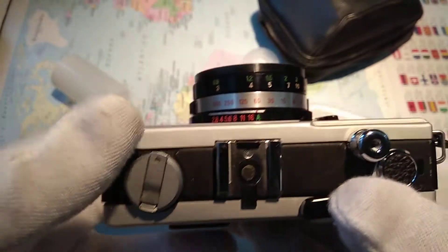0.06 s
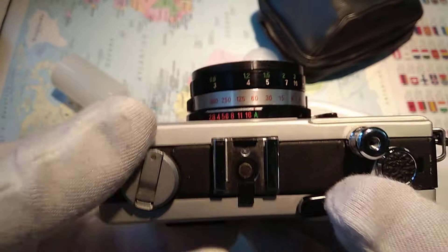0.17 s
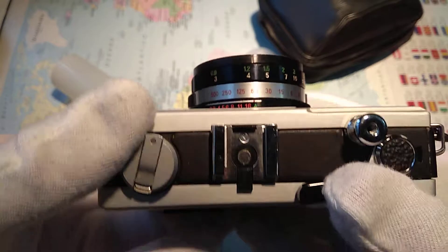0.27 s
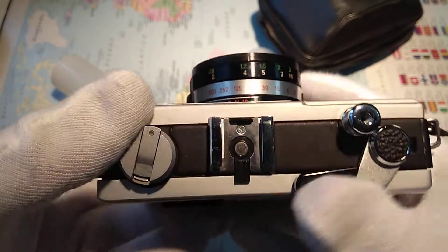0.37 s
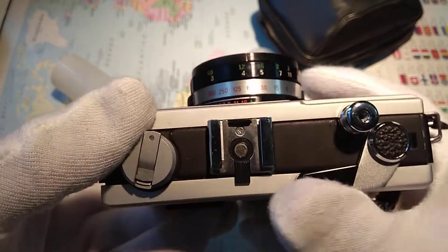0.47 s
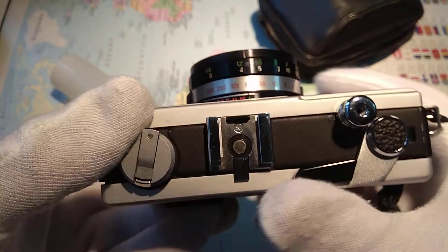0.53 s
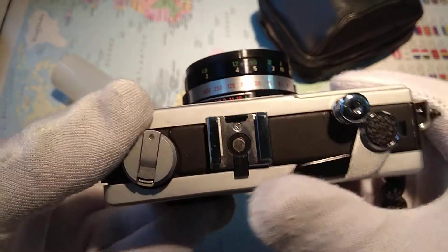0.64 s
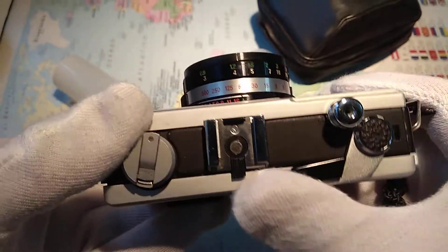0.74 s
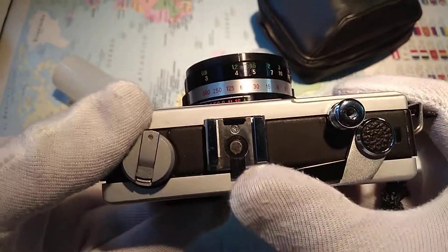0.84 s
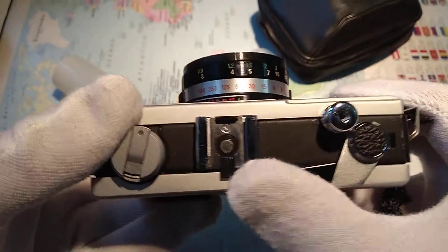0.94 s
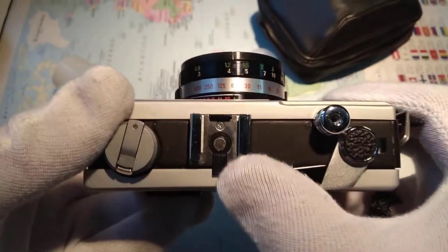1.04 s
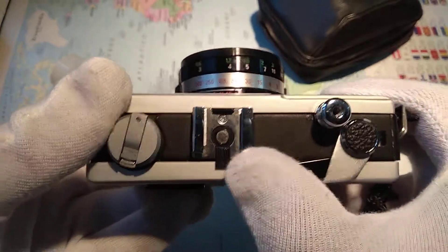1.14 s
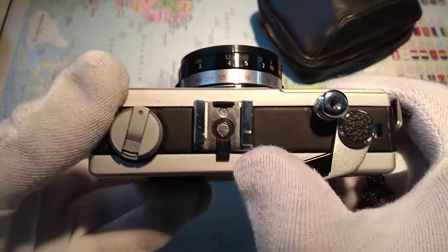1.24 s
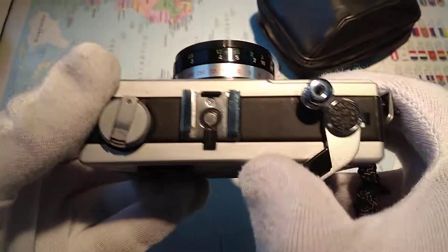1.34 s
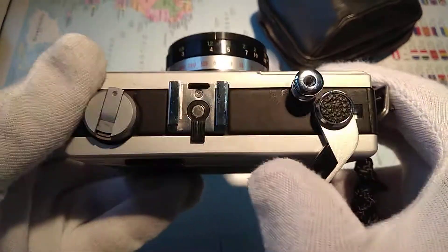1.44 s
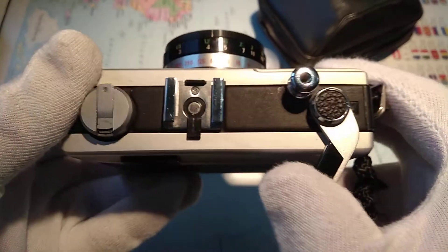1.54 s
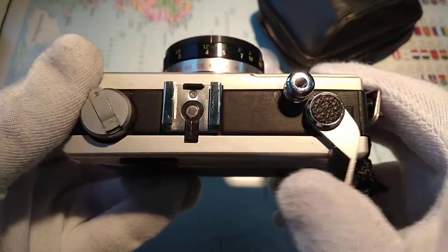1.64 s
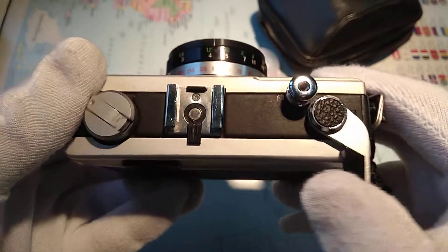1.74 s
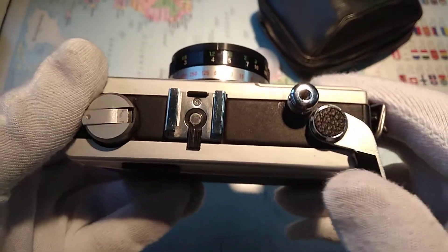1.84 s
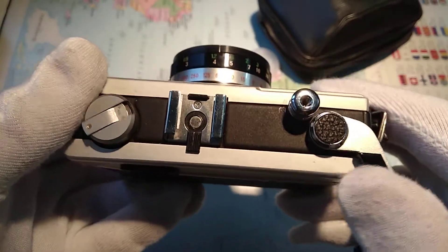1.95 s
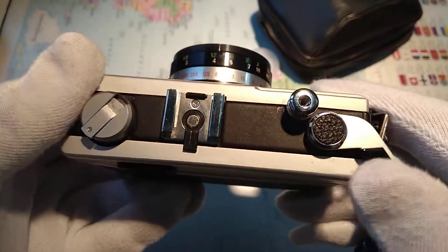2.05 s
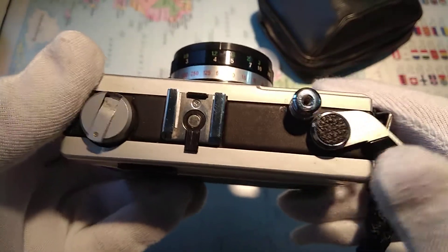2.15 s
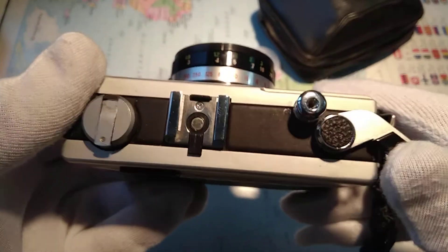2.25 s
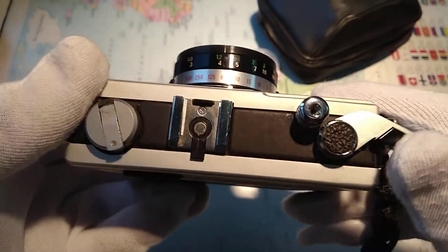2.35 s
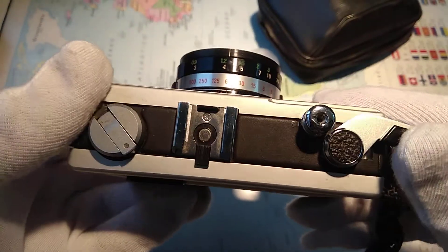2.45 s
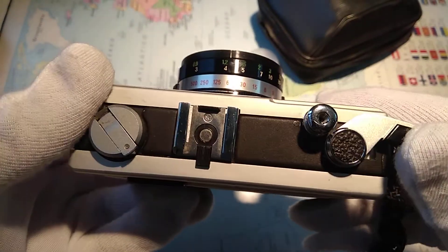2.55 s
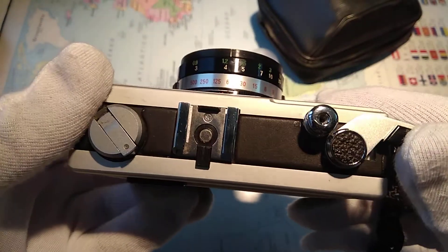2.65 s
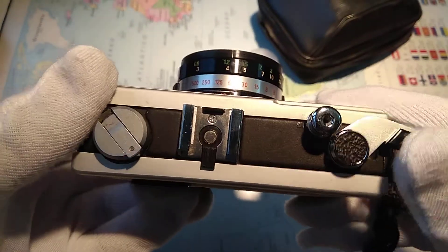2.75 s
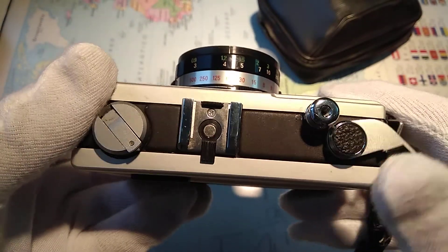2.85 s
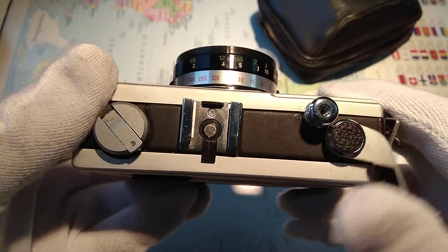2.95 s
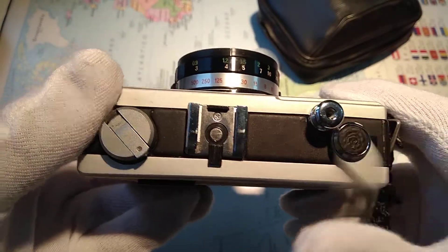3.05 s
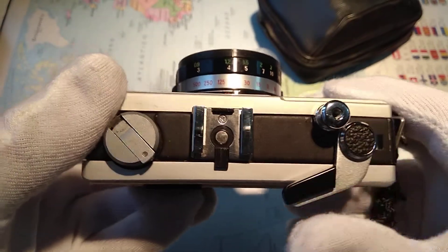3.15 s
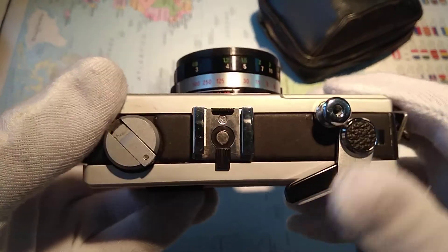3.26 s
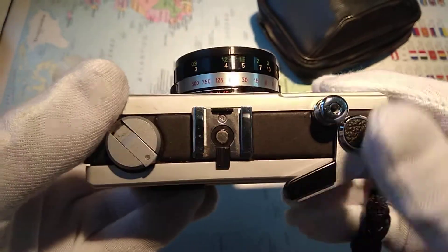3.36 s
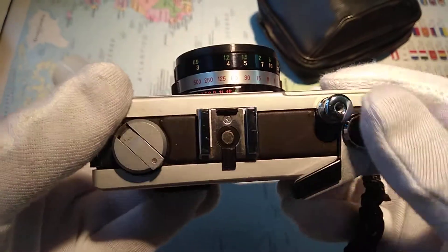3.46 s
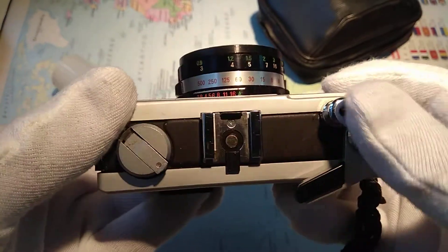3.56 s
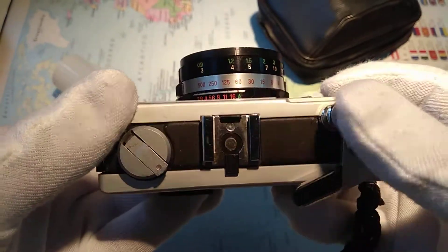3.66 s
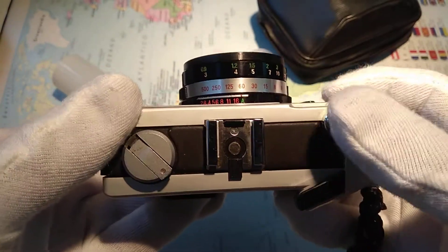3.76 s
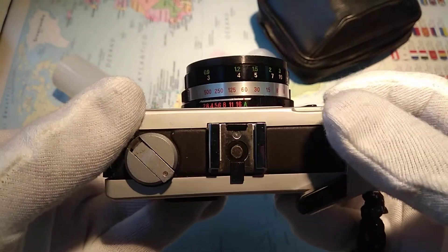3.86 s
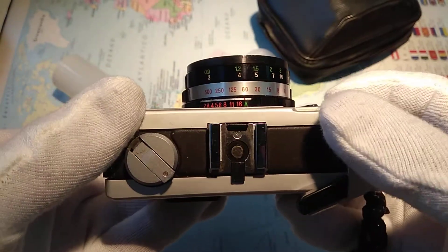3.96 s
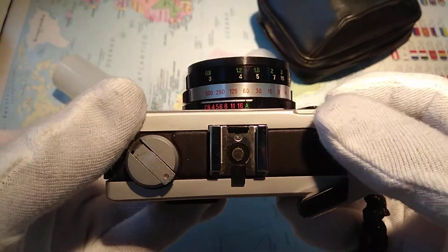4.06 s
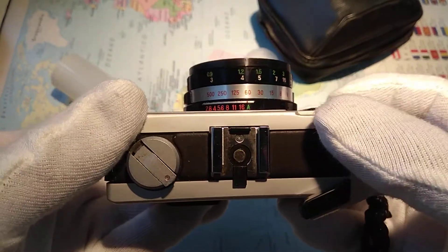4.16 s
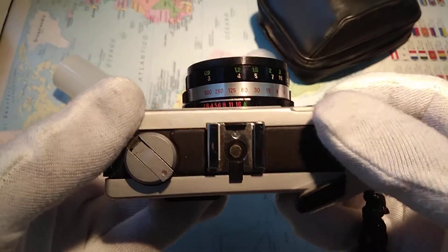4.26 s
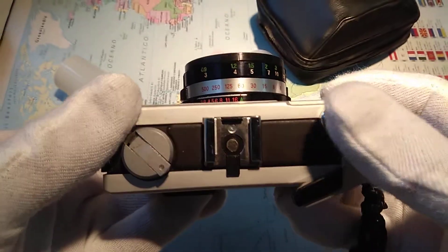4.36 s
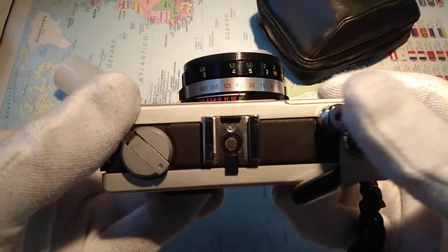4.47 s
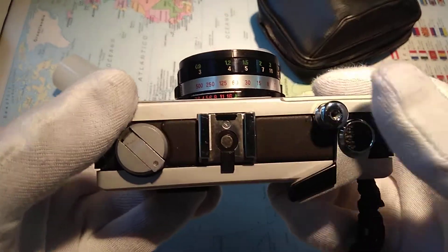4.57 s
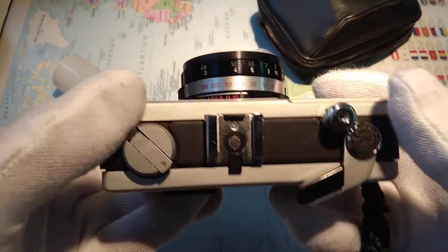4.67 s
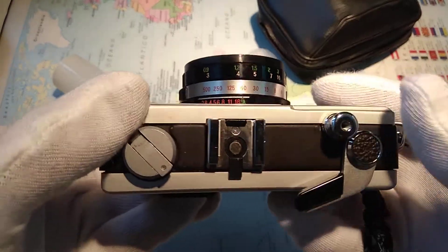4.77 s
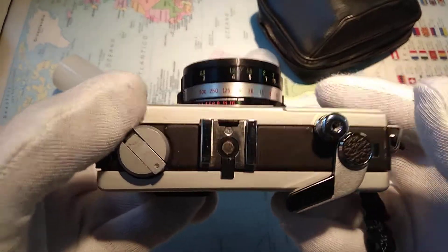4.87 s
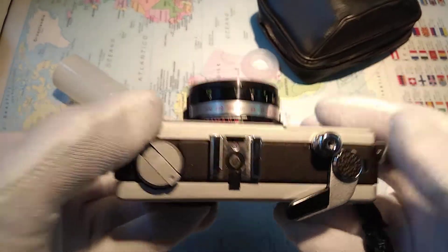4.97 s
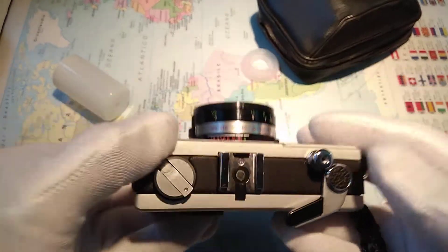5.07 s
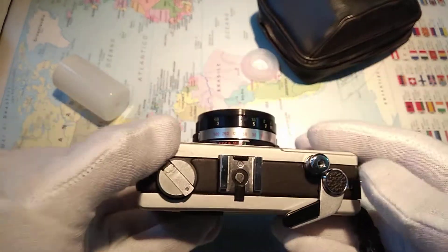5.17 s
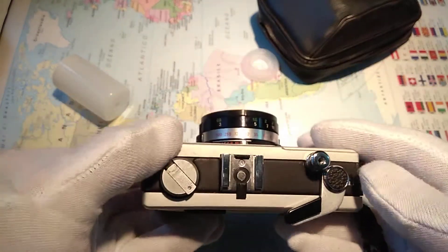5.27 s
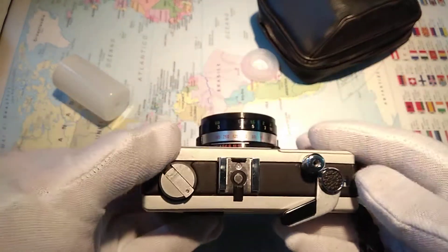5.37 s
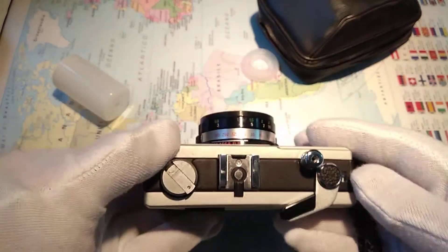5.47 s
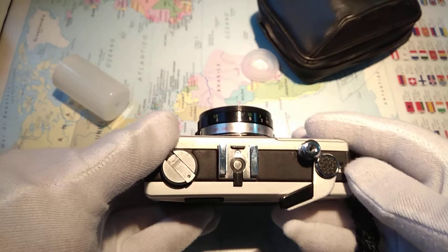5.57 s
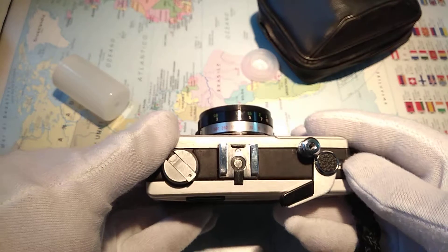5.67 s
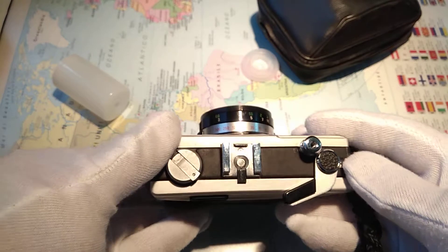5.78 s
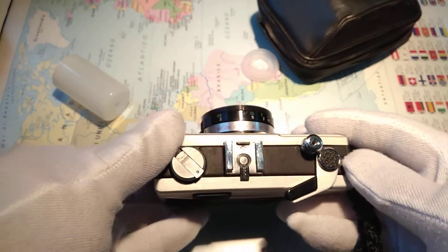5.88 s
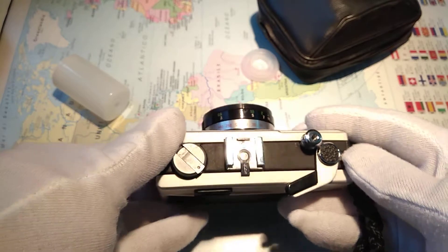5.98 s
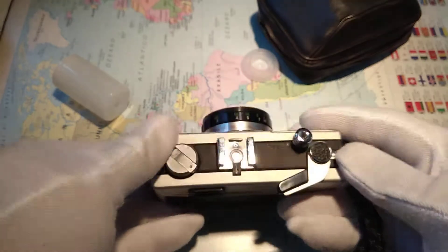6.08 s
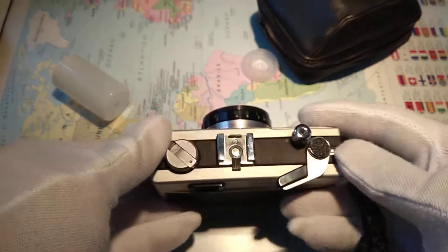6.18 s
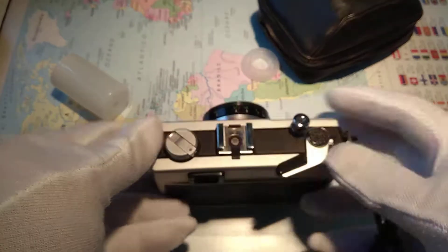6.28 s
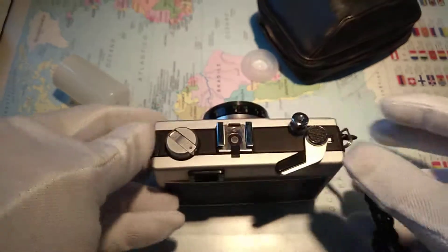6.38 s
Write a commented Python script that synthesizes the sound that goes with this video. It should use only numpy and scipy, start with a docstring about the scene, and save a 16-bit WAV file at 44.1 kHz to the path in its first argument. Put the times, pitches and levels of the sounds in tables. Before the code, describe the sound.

A close stereo phone-like pickup in a small room, with quiet low air murmur and soft cotton-glove hiss throughout. Light rubbing opens it; a clear small tick comes at 0.7 s, with fainter ones to 1.5 s. From 1.53 to 2.52 s the winding lever rasps: some forty dry, bright, uneven ratchet clicks, 20 to 30 milliseconds apart, with fine grit between. After a near-silent pause, faint clicks at 2.86 s lead into four or five strong return clicks from 3.01 s and a loud metallic clack at 3.14 s, ringing briefly. Small ticks follow at 3.6 s. The shutter fires at 4.13-4.16 s, a tight sharp double snap with a faint singing spring. Ticks at 4.39 and 4.5 s, then sparse rubbing, a brighter brush at 5.75 s. At 6.12 s the camera lands with a hard knock and short woody thump, then slight rustle as room air rises.

```python
"""A small metal film camera is wound by gloved hands: the pawl clicks over its ratchet, the lever springs back
to its stop, the shutter fires and the camera lands on a desk. Each blow is a short rattle of noise that rings
metal parts and a hollow shell; plates, spring and desk are fading sine tones. Cotton gloves hiss and room air
murmurs as shaped noise, and a small room answers the blows with fading noise."""
import sys
import numpy as np
from scipy import signal
from scipy.fft import rfft, irfft, next_fast_len
from scipy.io import wavfile
from scipy.ndimage import uniform_filter1d

SR = 44100
rng = np.random.default_rng(int(sys.argv[2]) if len(sys.argv) > 2 else 0)


def store_wav(level_fs):
    """Save 16-bit WAV to argv[1]."""
    pcm = np.round(np.clip(np.atleast_2d(level_fs), -1, 1) * 32767)
    wavfile.write(sys.argv[1], SR, pcm.T.astype(np.int16))


N = 282881  # length in samples

LEVER_HZ, LEVER_WIDTH_HZ = 9330, 330  # note of the winding lever
PAWL_PAN_DB = -1.5  # left minus right


def gain(db):
    """Turn decibels into a factor for the wave."""
    return 10 ** (np.asarray(db) / 20)


def frequencies(x):
    """Frequencies of the spectrum of x, nudged off zero so that logarithms work."""
    return np.arange(x.shape[-1] // 2 + 1) * SR / x.shape[-1] + 1e-3


def colour(x, points):
    """Filter by a curve through (Hz, dB) points, straight on a log-frequency axis."""
    hz, db = np.transpose(points)
    curve_db = np.interp(np.log(frequencies(x)), np.log(hz), db)
    return irfft(rfft(x) * gain(curve_db), x.shape[-1])


def band(x, hz, octaves):
    """Keep a bell-shaped band on a log-frequency axis."""
    bell = np.exp(-(np.log2(frequencies(x) / hz) / octaves) ** 2)
    return irfft(rfft(x) * bell, x.shape[-1])


def cut_bass(x, order, hz):
    """Take away what lies below hz; small bodies and rooms give little deep bass."""
    return signal.sosfilt(signal.butter(order, hz, "high", fs=SR, output="sos"), x)


def walk(rate):
    """Random levels, each held for 1 / rate seconds, then smoothed twice."""
    hold = int(SR / rate)
    steps = np.repeat(rng.standard_normal(N // hold + 1), hold)
    return uniform_filter1d(uniform_filter1d(steps, hold), hold)[:N]


def curve(table):
    """Draw straight lines between the rows of a table, sample by sample."""
    s, *columns = np.transpose(table)
    return [np.interp(np.arange(N) / SR, s, c) for c in columns]


def add(out, x, s):
    """Mix x into out from time s."""
    i = int(s * SR)
    out[..., i:i + x.shape[-1]] += x[..., :N - i]


def wash(points, level_db, tilt_db, pivot_hz, alike_hz, flicker_db, rate, left_late):
    """Half-octave noise bands share level and tilt but flicker alone; left and right are alike at low pitch."""
    mid, side = colour(rng.standard_normal((2, next_fast_len(N))), points)
    out = 0
    lowest_hz, highest_hz = points[0][0], points[-1][0]
    for hz in lowest_hz * 2 ** np.arange(0, np.log2(highest_hz / lowest_hz) + .5, .5):
        apart = min(hz / alike_hz, 1)
        stereo = mid + apart * side * np.array([[1], [-1]])
        pair = band(stereo, hz, .42)[:, :N] / np.sqrt(1 + apart ** 2)
        octaves = np.clip(np.log2(hz / pivot_hz), -1.5, 2.5)
        out = out + pair * gain(tilt_db * octaves + flicker_db * walk(rate))
    out[0] = np.roll(out[0], left_late)  # in samples
    return out / np.std(mid) * gain(level_db)


def chatter(shape, channels):
    """Noise under an envelope; many parts chatter at once, so its spectrum is pushed towards even."""
    x = shape * rng.standard_normal((channels, len(shape)))
    for _ in range(3):
        spectrum = rfft(x)
        even = irfft(spectrum / np.abs(spectrum), len(shape))
        x = shape * np.sign(even)
    return x * rng.uniform(0.078, 1, x.shape)


def resonances(modes, f, scatter_db):
    """Summed response of damped modes, each with its own strength; neighbours swing in opposite sense."""
    hz, width, db = np.transpose(modes)[:, :, None]
    strength = gain(db + scatter_db * rng.standard_normal(hz.shape))
    strength = strength * (-1) ** np.arange(len(hz))[:, None]
    return np.sum(strength * 1j * f * width / (hz ** 2 - f ** 2 + 1j * f * width), axis=0)


def clicks(s, peak_db, pan_db, tilt_db, t60, knock_db, ping_db, note_db, knock_tilt_db, ping_hz,
           ping_width, rise_s, alike, scatter_db):
    """Each blow is a short rattle that rings the metal parts and knocks the shell."""
    # thin metal parts: pitch_hz, width_hz, level_db
    metal = [(2315, 130, -25), (3400, 910, -39.5), (4540, 2400, -7), (6160, 2350, -3.5), (7440, 1300, -2.5),
             (8080, 560, 1.5), (10010, 440, 4), (11626, 2000, 3.5), (11650, 730, -6.5), (14400, 790, -4),
             (14340, 350, -7.5)]
    # hollow shell of the camera: pitch_hz, width_hz, level_db
    shell = [(580, 180, -2), (740, 190, 1), (1030, 310, 0.5), (1830, 360, 0.5), (2290, 1180, 1.5)]
    plate_hz, plate_width_hz = 1404, 80
    spike_db, spike_s = 6, 0.001  # first contact stands above the rattle that follows
    out, size = np.zeros((2, N)), 2048
    t, f = np.arange(size) / SR, np.arange(size // 2 + 1) * SR / size + 1
    octaves = np.log2(np.maximum(f, 2500) / 9000)
    knock_octaves = np.log2(np.maximum(f, 400) / 1000)
    for s, peak_db, pan_db, tilt_db, t60, knock_db, ping_db, note_db, knock_tilt_db, ping_hz in np.broadcast(
            s, peak_db, pan_db, tilt_db, t60, knock_db, ping_db, note_db, knock_tilt_db, ping_hz):
        rise = 1 - np.exp(-(t / rise_s) ** 2)
        shape = rise * gain(spike_db * np.exp(-(t / spike_s) ** 2) - 60 * t / t60)
        shared, own = chatter(shape, channels=1), chatter(shape, channels=2)
        # the two sound ports see the parts from different sides, so the rattle is only partly alike
        rattle = rfft(alike * shared + (1 - alike) * own)
        parts = sorted(metal + [(ping_hz, ping_width, ping_db)])
        ring = irfft(rattle * resonances(parts, f, scatter_db) * gain(tilt_db * octaves), size)
        hollow = shell[:3] + [(plate_hz, plate_width_hz, note_db)] + shell[3:]
        knock_response = resonances(hollow, f, scatter_db) * gain(knock_tilt_db * knock_octaves)
        knock = irfft(rfft(shared + own) * knock_response, size)
        blow = gain(peak_db) * ring / np.abs(ring).max() + gain(knock_db) * knock / np.abs(knock).max()
        add(out, blow * gain(np.array([[pan_db], [-pan_db]]) / 2), s)
    return out


def gloves():
    """Cotton strokes swell, hold and fade as hiss; the louder a stroke, the more it sets the colour."""
    # strokes over the body: start_s, length_s, level_db, tilt_db_per_octave
    strokes = [(0, 0.2, -64.5, -11), (0.217, 0.21, -59.5, -8), (0.352, 0.14, -58.5, -3),
               (0.473, 0.24, -55, -2), (0.683, 0.14, -60.5, -11.5), (0.906, 0.11, -61, -10.5),
               (1.14, 0.095, -59, -11), (1.196, 0.2, -59.5, -9), (1.603, 0.35, -61, -11),
               (2.335, 0.23, -90, -10), (2.828, 0.26, -61.5, -9), (3.449, 0.21, -57.5, -10),
               (3.63, 0.099, -63.5, -13), (3.743, 0.44, -63, -12.5), (4.271, 0.17, -56, -10.5),
               (4.511, 0.22, -61.5, -7.5), (5.016, 0.15, -56, -8.5), (5.409, 0.043, -67.5, -20),
               (5.584, 0.4, -60.5, -13), (5.71, 0.13, -57, -20), (5.734, 0.11, -45, -9),
               (5.897, 0.18, -63.5, -12.5), (6.126, 0.073, -69, -3), (6.247, .16, -56, -7)]
    # hiss of cotton: pitch_hz, level_db_per_hz
    cotton = [(1500, -45), (2600, -25.5), (3400, -19.5), (4800, -14.5), (5800, -12.5), (8200, -1.5),
              (11500, 3.5), (14800, 1.5), (15800, -13), (16500, -52.5)]
    attack_s, fade_db_per_s = 0.038, 203.5
    grip_db, grip_tilt_db = -75, -14  # faint rustle of gloves that only hold
    t = np.arange(N) / SR
    power = np.full(N, gain(2 * grip_db))
    tilted = power * grip_tilt_db
    for s, length, db, tilt_db in strokes:
        fade_db = fade_db_per_s * np.maximum(t - s - length, 0)
        swell = np.clip((t - s) / attack_s, 0, 1)
        stroke = (swell * gain(db - fade_db)) ** 2
        power, tilted = power + stroke, tilted + tilt_db * stroke
    hiss = wash(cotton, 10 * np.log10(power), tilted / power, 9000, alike_hz=4040,
                flicker_db=4.5, rate=25, left_late=0)
    # fibres catch and slip, which roughens the hiss
    return hiss * gain(0.64 * walk(180))


def murmur():
    """Room air is soft noise, slightly brighter as it swells, a little louder and earlier on the right."""
    # murmur of air in the room: time_s, level_db
    air_levels = [(0, -64), (.3, -67.5), (.9, -66.5), (1.5, -59), (1.8, -58.5), (4.2, -60.5), (5.1, -59.5),
                  (5.65, -55.5), (6.1, -50.5), (6.41, -47.5)]
    # colour of the murmur: pitch_hz, level_db_per_hz
    air_colour = [(20, -41), (55, -19.5), (82, -27.5), (105, -19.5), (155, 0.5), (200, -1.5), (255, -9),
                  (310, -1), (480, -13), (600, -11.5), (730, -4.5), (870, -10), (1400, -9), (1900, -15),
                  (2300, -15.5), (2800, -21), (4000, -28), (9000, -39.5), (15000, -48.5)]
    # change of the low middle, around 390 Hz: time_s, level_db
    middle_levels = [(.3, 3), (.42, -7), (.65, -20), (.75, 3), (1.3, 4.5), (1.7, -4), (3.4, -2), (3.6, 3.5),
                     (5.5, 2.5), (6.41, -3.5)]
    # change of the upper middle, around 1700 Hz: time_s, level_db
    upper_levels = [(0, 1.5), (.17, 6.5), (.3, 9.5), (.5, 3), (.9, 7), (1.1, 6.5), (1.4, 1), (2.0, 2),
                    (2.7, -1.5), (3.3, -0.5), (3.6, 3.5), (4.0, 5), (4.6, 3.5), (5.2, 2), (5.8, -0.5),
                    (6.41, -3)]
    pivot_level_db, tilt_per_db = -54, 0.0681  # dB per octave of tilt for each dB above the pivot level
    level_db, = curve(air_levels)
    air = wash(air_colour, level_db, tilt_per_db * (level_db - pivot_level_db), 400, alike_hz=2350,
               flicker_db=1.34, rate=4.8, left_late=16)
    air = air * gain([[-.8], [.8]])
    middle_db, = curve(middle_levels)
    upper_db, = curve(upper_levels)
    middle = (gain(middle_db) - 1) * band(air, 390, 0.77)
    # the upper middle also rustles unevenly
    upper = (gain(upper_db + 1.6 * walk(22)) - 1) * band(air, 1700, 1.7)
    return air + middle + upper


def body_ticks():
    """Button, strap and fingers tick on the body, each ringing a ping of its own; the last row is a light knock
    on the desk."""
    # ticks: start_s, peak_db, left_minus_right_db, tilt_db_per_octave, rattle_t60_s, knock_db,
    # plate_note_db, ping_hz, ping_db
    tick_table = [(0.7043, -22.5, 8, -1, .007, -40.5, -6, 10020, 13),
                  (0.768, -36, -3, -4, .02, -60, -8, 7200, 11), (1.165, -44, 3, -8, .015, -65, -8, 3530, 0),
                  (1.1725, -36, -2, -6.5, .015, -47, -6, 5000, 2),
                  (1.1768, -36.5, -1, -4, .015, -42.5, -6, 7040, -4),
                  (1.3128, -32.5, -2, -2.5, .035, -65, -8, 9400, 10),
                  (1.398, -55, -7, -5, .015, -45, -3, 4000, -4),
                  (1.483, -38, -4, -11.5, .02, -56, -8, 4050, -4),
                  (1.507, -32, -3, -14, .02, -39.5, -4, 6300, 2),
                  (2.991, -36, 1.5, -1, .02, -51, -15, 4150, 0),
                  (3.445, -41, 4, 1, .012, -66, -8, 11500, 5),
                  (3.468, -37.5, 1, -7, .02, -69, -10, 4150, 0),
                  (3.6075, -28.5, -10, -4, .01, -76, -8, 7900, 20),
                  (3.6177, -19, 2.5, -1, .018, -51, -8, 4100, 1),
                  (3.6695, -33.5, -2, -10, .013, -66, -8, 4800, 1.5),
                  (3.9666, -44, 1, -17, .02, -52, -8, 4150, 5),
                  (4.0747, -34.5, -6, 1, .02, -57, -5, 4150, -3),
                  (4.3275, -32, 0, -9, .015, -66, -8, 4300, 1.5),
                  (4.3862, -32, -7, 1, .025, -37.5, 22, 3070, 2),
                  (4.3907, -21, 7, 0, .025, -39, 17, 4830, -8),
                  (4.3935, -27, 0, -4, .025, -40, 12, 9600, 11),
                  (4.3955, -23.5, -9, -5, .025, -50, 12, 8070, 14),
                  (4.5022, -18.5, -6, -0.5, .013, -56, -5, 4200, 1),
                  (4.8304, -43, 1, -9.5, .02, -60, -11, 4240, 3.5),
                  (5.667, -28, -1, -5, .02, -54, -9, 4150, 3),
                  (5.7146, -36.5, 4, -5, .02, -64, -8, 5000, 3),
                  (5.7563, -27, 17, 14, .02, -62, -8, 14340, 1), (6.26, -31, 5, 9, .02, -68, -8, 12000, -2),
                  (6.308, -36, -3, -6, .02, -70, -8, 6900, 7), (6.3521, -58, 2, 3, .02, -41, -6, 4150, 0)]
    s, peak_db, pan_db, tilt_db, t60, knock_db, note_db, ping_hz, ping_db = np.transpose(tick_table)
    ticks = clicks(s, peak_db, pan_db, tilt_db, t60, knock_db, ping_db, note_db, -3, ping_hz,
                   ping_width=700, rise_s=.0006, alike=0.33, scatter_db=3.0)
    return cut_bass(ticks, 6, 480)


def room(dry, gap_s):
    """Each narrow band stores energy and lets it out as fading noise, unrelated left and right."""
    # diffuse tail: pitch_hz, t60_s, level_db
    tail_table = [(147.5, 0.33, -13), (300, 0.28, -12.5), (640, 0.53, -7.5), (1004, 0.49, -7.5),
                  (1510, 0.36, -10.5), (2820, 0.32, -8.5), (4200, 0.58, -5.5), (6700, 0.46, -8.5),
                  (9450, 0.43, -11), (11970, 0.35, -10.5), (15500, .36, -7)]
    size, hop = 256, 64
    f, _, given = signal.stft(dry.mean(axis=0), SR, nperseg=size, noverlap=size - hop)
    hz, t60, db = np.transpose(tail_table)
    t60, db = (np.interp(np.log(f + 1), np.log(hz), c) for c in (t60, db))
    keep = gain(-120 * hop / SR / t60)  # share of the energy left after one hop
    energy = uniform_filter1d(np.abs(given) ** 2, size=5, axis=0)  # spread over neighbouring bands
    held = np.array([signal.lfilter([1 - k], [1, -k], p) for k, p in zip(keep, energy)])
    noise = signal.stft(rng.standard_normal((2, N)), SR, nperseg=size, noverlap=size - hop)[2]
    noise = noise / np.sqrt(np.mean(np.abs(noise) ** 2))
    tail = noise * np.sqrt(held) * gain(db)[:, None]
    out = np.zeros((2, N))
    add(out, signal.istft(tail, SR, nperseg=size, noverlap=size - hop)[1], gap_s)
    return cut_bass(out, 4, 125)


def grit():
    """Gear teeth and film catch unevenly during winding, as faint clicks at random times and levels."""
    start_s, end_s, count = 1.4, 2.3, 70
    base_db, scatter_db = -39, 3
    place, size = rng.random((count, 2)).T
    s = start_s + (end_s - start_s) * place
    peak_db = base_db - scatter_db * np.log(.1 + size)
    return clicks(s, peak_db, PAWL_PAN_DB, -2.5, 0.011, peak_db - 20, 0, 0, 0, LEVER_HZ, LEVER_WIDTH_HZ,
                  rise_s=0.00067, alike=0.38, scatter_db=5.0)


def ratchet_pawl():
    """The pawl drops off ratchet teeth; each drop rattles the metal and rings the lever."""
    # drops: start_s, peak_db, tilt_db_per_octave, rattle_t60_s
    tooth_table = [(1.5329, -18.5, -1.5, .013), (1.5764, -15, -0.5, 0.015), (1.6, -18.5, 2.5, 0.016),
                   (1.6222, -14, 1.5, .013), (1.6404, -26, -5, .012), (1.6506, -20.5, -1, 0.014),
                   (1.6746, -15.5, 0.5, 0.013), (1.6983, -23, 0, 0.019), (1.7175, -15.5, 4, 0.012),
                   (1.739, -21, 0, 0.015), (1.7533, -24, 3, 0.011), (1.7655, -16, -0.5, 0.019),
                   (1.794, -20, 0.5, 0.014), (1.8125, -16.5, 0.5, 0.018), (1.826, -15, 3, 0.0097),
                   (1.8297, -19, 1.5, 0.016), (1.8485, -15, 3, 0.018), (1.8657, -22, -1.5, 0.02),
                   (1.8805, -16.5, 1, 0.013), (1.894, -18, 0, 0.01), (1.8973, -20, -2, 0.019),
                   (1.9262, -17.5, -1, 0.016), (1.9604, -19.5, 3, 0.013), (1.9864, -15.5, 2, 0.015),
                   (2.0053, -13, 2.5, 0.016), (2.032, -16.5, 0, .014), (2.0726, -20, 1, .017),
                   (2.1013, -15, 2, 0.011), (2.1331, -17.5, 0.5, 0.022), (2.1657, -17, 1, 0.017),
                   (2.172, -21, 5, 0.016), (2.184, -22.5, -6.5, 0.013), (2.1915, -19, 4, 0.016),
                   (2.2116, -17, -1, 0.013), (2.235, -14.5, 2.5, 0.017), (2.268, -17.5, 2, .015),
                   (2.3341, -16.5, 2, 0.011), (2.3578, -16, 0, 0.018), (2.3901, -18, 3, 0.017),
                   (2.4155, -14, 3.5, .014), (2.4427, -19, -1.5, 0.014), (2.4653, -15, 2, .013),
                   (2.4893, -15, 1.5, 0.015), (2.517, -14, 1, 0.023), (2.8568, -33, -2, 0.01),
                   (2.8714, -33, 1, 0.013), (2.9, -32.5, -2.5, 0.016), (2.982, -37, -12, 0.011),
                   (3.014, -13.5, 6, 0.018), (3.05, -11, 4.5, 0.012), (3.089, -11, 5, 0.014),
                   (3.1202, -10, 3, .014), (3.123, -22.5, -11.5, 0.043)]
    wind_ping_db, return_ping_db, returns_s = 5, 13.5, 2.7  # the lever rings harder on the way back
    s, peak_db, tilt_db, t60 = np.transpose(tooth_table)
    ping_db = np.where(s > returns_s, return_ping_db, wind_ping_db)
    knock_db = -49 + 4.0 * rng.standard_normal(len(s))
    pawl = clicks(s, peak_db, PAWL_PAN_DB, tilt_db, t60, knock_db, ping_db, 8, -4.5, LEVER_HZ, LEVER_WIDTH_HZ,
                  rise_s=0.0012, alike=0.24, scatter_db=2.2)
    return cut_bass(pawl, 6, 480)


def spring_and_jolts():
    """A spring sings after the shutter and jolts pass through hands and desk, all as fading sine tones."""
    # spring: start_s, pitch_hz, level_db, t60_s
    spring_tones = [(4.157, 931, -57.5, 1.8)]
    # short jolts: start_s, pitch_hz, level_db, t60_s
    jolt_tones = [(3.1403, 625, -32.5, 0.068), (3.142, 957, -35, 0.067), (3.144, 1404, -28.5, 0.11),
                  (2.184, 2370, -40, 0.035), (4.135, 50, -61.5, .1), (4.135, 210, -43, 0.066),
                  (4.154, 330, -39, 0.037), (6.123, 48, -36, 0.13), (6.353, 696, -35, 0.038),
                  (6.353, 1740, -34.5, 0.027)]
    out, t = np.zeros(N), np.arange(SR) / SR
    for s, hz, db, t60 in spring_tones + jolt_tones:
        add(out, gain(db - 60 * t / t60) * np.sin(2 * np.pi * hz * t), s)
    return out


def hard_stops():
    """Lever, shutter blades and the landing body stop hard, ringing the metal and knocking the shell."""
    # stops: start_s, peak_db, tilt_db_per_octave, rattle_t60_s, knock_db, lever_ping_db, plate_note_db,
    # knock_tilt_db_per_octave
    stop_table = [(3.132, -7.5, -3, 0.016, -37, 7, 5, -5), (3.1362, -6.5, 2, 0.014, -32, 1.5, 3, -7),
                  (3.1388, 4, -3.5, 0.013, -18, 8.5, 7.5, -5),
                  (3.1405, -1, -5.5, 0.023, -16, 9, 11.5, -9.5),
                  (4.1325, -13, 1.5, 0.037, -33, -2, 14.5, -3),
                  (4.1345, -6.5, -12, 0.028, -19, -0.5, 12, -1),
                  (4.1365, -0.5, 7.5, 0.024, -32, 17.5, 4, 7.5),
                  (4.139, 0.5, -2, 0.016, -34.5, 2.5, 3.5, -4),
                  (4.1435, -16, -5, 0.063, -37.5, 1.5, 18, -11), (4.147, -13, 2.5, 0.056, -18, 15, 2.5, 7),
                  (4.1508, -12, -1, 0.18, -29.5, 3, 1.5, 4), (4.154, -1.5, 1, 0.02, -19, 7.5, 14.5, 3),
                  (4.1575, -17, 2, 0.034, -42, 7.5, 4.5, 2), (6.1238, -3.5, 2, 0.028, -12, -3, 19, 5.5),
                  (6.138, -8.5, -4.5, 0.044, -25, 9.5, -3, -7)]
    s, peak_db, tilt_db, t60, knock_db, ping_db, note_db, knock_tilt_db = np.transpose(stop_table)
    stops = clicks(s, peak_db, -1, tilt_db, t60, knock_db, ping_db, note_db, knock_tilt_db,
                   LEVER_HZ, LEVER_WIDTH_HZ, rise_s=0.00079, alike=0.21, scatter_db=0.5)
    return cut_bass(stops, 6, 480)


def plates():
    """Plates ring on as thin fading tones that waver as the hands move the body."""
    # tones of the plates: pitch_hz, level_db, t60_s
    plate_tones = [(4120, -5.5, 0.38), (4380, -3, .25), (4834, -10, .2), (6150, -6, .2), (6993, -16.5, .2),
                   (7415, -6, .3), (8091, -11, .25), (8860, -3.5, .28), (8969, -2.5, 0.225),
                   (9297, -2.5, .24), (10320, -0.5, .16), (10680, -7, .3), (11090, -5.5, .16),
                   (12340, -5, .2)]
    # strikes that set them ringing: start_s, level_db
    strikes = [(3.143, -31.5), (4.153, -42)]
    out, t = np.zeros((2, N)), np.arange(SR // 2) / SR
    for s, strike_db in strikes:
        for hz, db, t60 in plate_tones:
            # a new random level every 10 ms
            waver = gain(7.7 * np.interp(t, np.arange(50) / 100, rng.standard_normal(50)))
            tone = np.sin(2 * np.pi * (hz * t + rng.random((2, 1))))
            add(out, waver * gain(strike_db + db - 60 * t / t60) * tone, s)
    return out


def desk():
    """A half-sine push is heard directly and rings the low modes of the desk top."""
    # camera landing: start_s, ring_db, contact_s, thud_db
    landings = [(6.123, -5.5, 0.00058, -2.5), (6.142, -18, 0.00166, -42)]
    # modes of the desk top, levels relative to each other: pitch_hz, level_db, t60_s
    desk_modes = [(159, 8, 0.16), (193, -6, 0.26), (223.6, -0.5, 0.31), (264, -13, 0.42), (292, -7.5, 0.43),
                  (394, -17.5, 0.22), (441, -7.5, 0.18), (610, -33, 0.32), (715, 1.5, 0.064),
                  (1060, -27.5, 0.13)]
    out, t = np.zeros((2, N)), np.arange(SR // 2) / SR
    ring = np.zeros((2, len(t)))
    for hz, db, t60 in desk_modes:
        # each mode reaches the two sound ports at a slightly different phase
        phase = rng.uniform(-1.8, 1, (2, 1)) * hz / 700
        ring += gain(db - 60 * t / t60) * np.sin(2 * np.pi * hz * t + phase)
    for s, ring_db, contact, thud_db in landings:
        push = np.sin(np.pi * np.clip(t[None, :512] / contact, 0, 1))
        pushed_ring = signal.fftconvolve(ring, push / push.sum(), axes=1)
        add(out, gain(ring_db) * pushed_ring / np.abs(ring).max(), s + contact)
        add(out, -gain(thud_db) * push, s)
    return cut_bass(out, 3, 125) * gain([[-.9], [.9]])


def scene():
    """Camera and desk sound in the room, over gloves and air."""
    pawl_tail_db, tick_tail_db, desk_tail_db = -2, -5, -3.5  # light clicks leave less tail than hard stops
    echo_s, echo_db = 0.0096, -22  # first strong reflection
    pawl, ticks, stops = ratchet_pawl(), body_ticks(), hard_stops()
    thump = desk()
    out = pawl + ticks + stops
    # the reflection swaps left and right
    add(out, gain(echo_db) * (pawl + stops)[::-1], echo_s)
    sent = gain(pawl_tail_db) * pawl + gain(tick_tail_db) * ticks + stops + gain(desk_tail_db) * thump
    tail = room(sent, gap_s=0.007)
    # loose parts buzz, which roughens the tail
    rough_tail = tail * gain(1.5 * walk(200))
    return out + thump + rough_tail + grit() + plates() + spring_and_jolts() + gloves() + murmur()


def record(dry):
    """The phone rounds the loudest peaks and cuts the top."""
    # treble response: pitch_hz, level_db
    treble = [(15600, -0.5), (16100, -22)]
    top_hz = 16900
    rounded = colour(.92 * np.tanh(dry / .92), treble)
    return signal.sosfilt(signal.ellip(12, .2, 95, top_hz, fs=SR, output="sos"), rounded)


dry = scene()
out = record(dry)
store_wav(out)
```